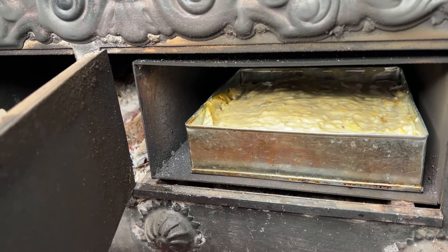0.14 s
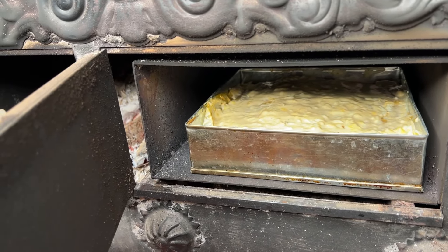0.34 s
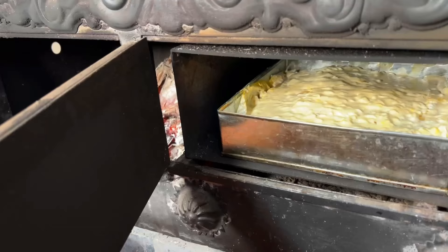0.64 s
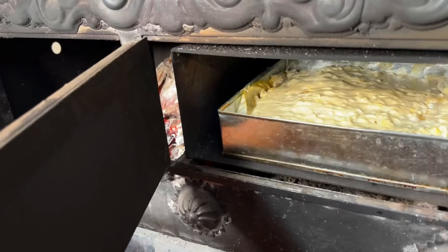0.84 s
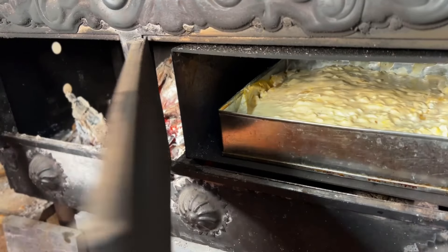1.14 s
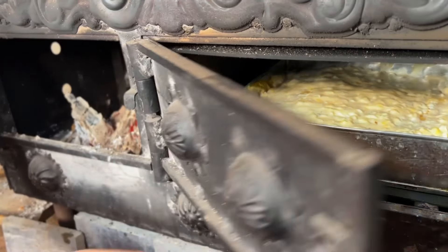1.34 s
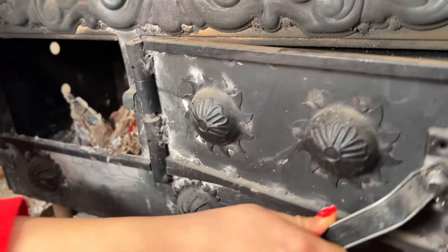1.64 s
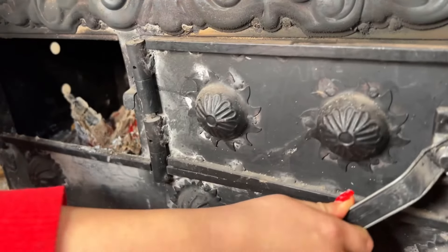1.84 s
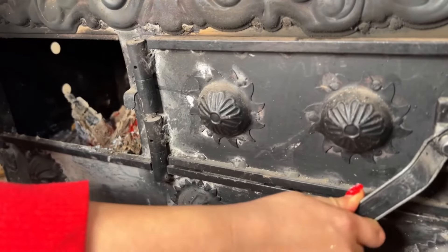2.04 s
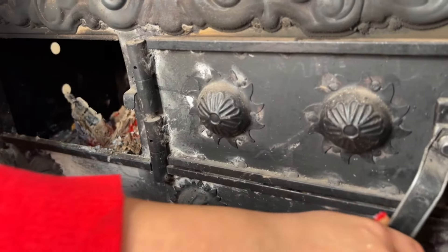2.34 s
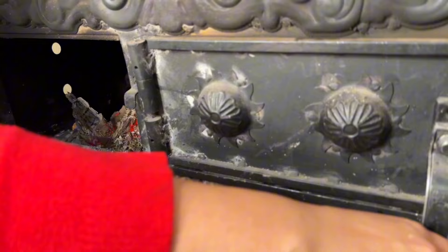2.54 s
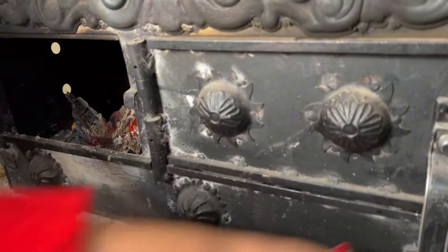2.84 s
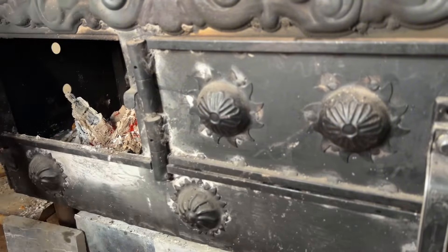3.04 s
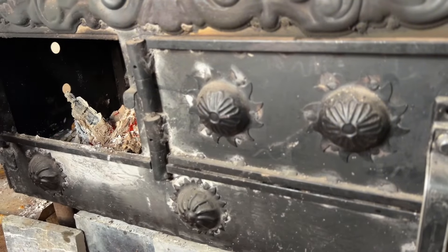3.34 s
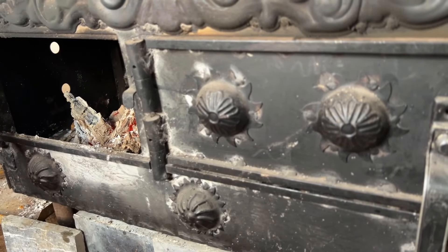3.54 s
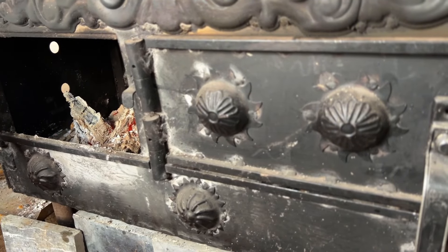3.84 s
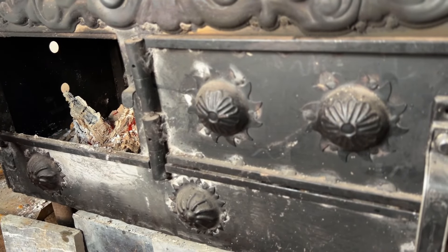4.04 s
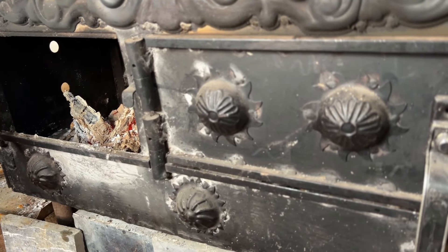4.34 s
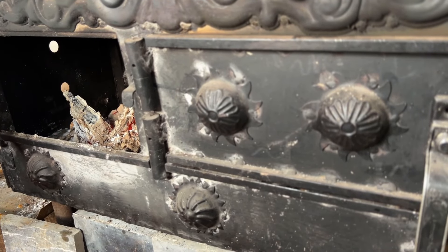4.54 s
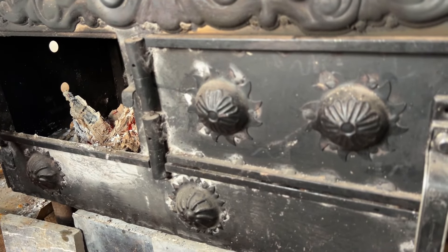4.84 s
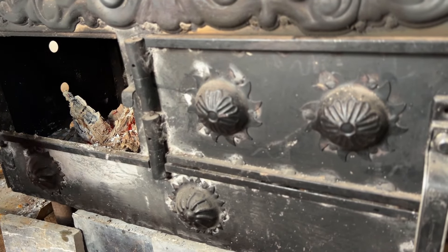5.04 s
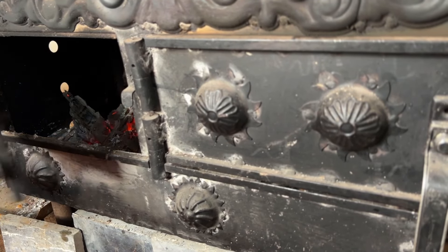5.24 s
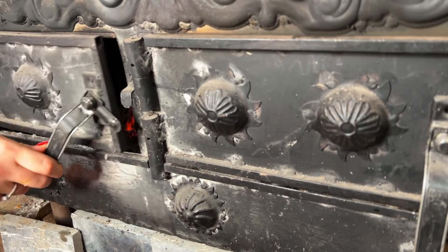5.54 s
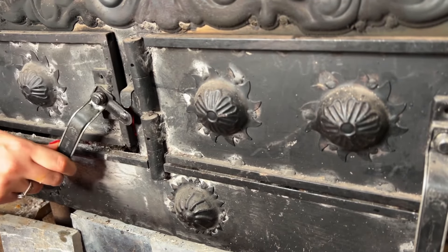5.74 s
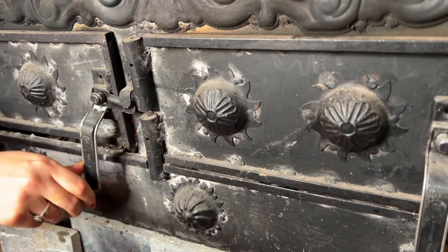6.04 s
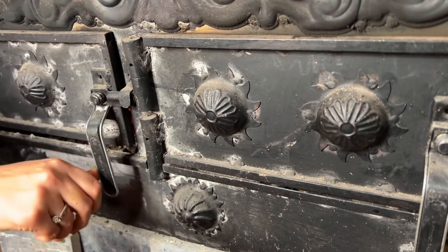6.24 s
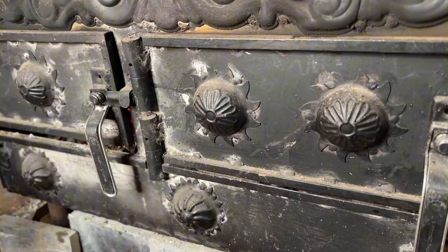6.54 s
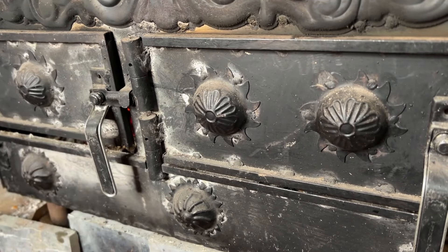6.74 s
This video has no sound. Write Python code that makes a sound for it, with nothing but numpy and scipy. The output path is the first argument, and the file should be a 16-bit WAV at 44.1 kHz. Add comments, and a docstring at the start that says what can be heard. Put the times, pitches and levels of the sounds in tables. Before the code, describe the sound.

Two cast-iron stove doors swing shut close by: a hinge groan and loud knocks, then a piercing squeal, a heavy slam and a latch clank.

```python
"""In a kitchen, heard from close by, two cast-iron stove doors are swung shut and latched.
The dry hinges judder, groan and squeal: wavering tones with multiples, one door mode after another.
The doors knock home, the latch clanks and the stove ticks: clicks ring the iron and start noise bursts.
Below lie the rub of the hinge pins, which keeps the doors singing, and a low rumble of draught
that swells with the thump of the blows, all from noise."""
import sys
import numpy as np
from scipy import signal
from scipy.io import wavfile
from scipy.ndimage import uniform_filter1d

SR = 44100
rng = np.random.default_rng(int(sys.argv[2]) if len(sys.argv) > 2 else 0)


def int16_out(signal):
    """Quantize to a 16-bit WAV file."""
    q = np.round(np.clip(np.atleast_2d(signal).T, -1, 1) * 32767)
    wavfile.write(sys.argv[1], SR, q.astype(np.int16))


N = 303929
TIME = np.arange(N) / SR
CONTACT_S = .002   # how softly a blow lands


def undb(db):
    """Decibels to gain."""
    return 10 ** (np.asarray(db) / 20)


def rms_one(x):
    """Scale to unit rms."""
    return x / np.sqrt(np.mean(x ** 2) + 1e-20)


def at_hz(points, hz):
    """Read a table of (frequency, value) on a log-frequency axis."""
    points = np.array(points)
    return np.interp(np.log(hz), np.log(points[:, 0]), points[:, 1])


def swell(t, peak_s, hold_s, growth, fall):
    """Decibels below the peak: a steady growth, a hold, a steady fall."""
    rising = -abs(growth) * np.maximum(peak_s - t, 0)
    falling = -abs(fall) * np.maximum(t - peak_s - hold_s, 0)
    return rising + falling


def summed(levels_db):
    """Power sum of levels, in dB."""
    return 10 * np.log10(sum(undb(db) ** 2 for db in levels_db) + 1e-30)


def drift(rate_hz, size):
    """Random wander of unit spread, faster at a higher rate, drawn 400 times a second."""
    knots = rng.standard_normal(int(size / SR * 400) + 2)
    r = np.exp(-2 * np.pi * min(rate_hz, 190) / 400)
    wander = rms_one(signal.detrend(signal.lfilter([1], [1, -r], knots)))
    return np.interp(np.arange(size) * 400 / SR, np.arange(len(knots)), wander)


def band_noise(low_hz, high_hz, order, white):
    """White noise kept between two frequencies."""
    return signal.sosfilt(signal.butter(order, [low_hz, high_hz], "band", fs=SR, output="sos"), white)


def add_note(out, note, side, orders, bend, ring_db, ring_fall, faster, linger_s,
             wobble, flutter_db, slide=0, rasp=0):
    """One note of the iron: a wavering tone and any multiples grow, hold and fall, and the tone rings on.

    bend: pitch share per dB below the peak; wobble: random pitch share; slide: Hz/s; rasp: fast roughness.
    ring_db, ring_fall: start [dB] and fall [dB/s] of the ringing on.
    faster, linger_s: each further multiple moves this many dB/s faster; multiples hold this much longer.
    """
    peak_s, hold_s, pitch_hz, level_db, growth, fall = note
    span = slice(int(peak_s * SR) - SR // 6, int(peak_s * SR) + SR // 2)
    t = TIME[span]
    driven = swell(t, peak_s, hold_s, growth, fall)
    hz = pitch_hz * (1 + bend * np.maximum(driven, ring_db) + wobble * drift(82, len(t)))
    slide_lead_s = .025   # the slide starts this long before the peak and stops as long after the hold
    hz += slide * np.clip(t - peak_s, -slide_lead_s, hold_s + slide_lead_s)
    phase = 2 * np.pi * np.cumsum(hz) / SR
    fade = np.clip(np.minimum(t - t[0], t[-1] - t) / .03, 0, 1)
    pan_db, lead, lead_step = side
    for k, order_db in orders:
        if k == 1:
            shape = summed([driven, ring_db + swell(t, peak_s, hold_s, growth, ring_fall)])
        else:
            extra = faster * (k - 1)
            shape = swell(t, peak_s, hold_s + linger_s, growth + extra, fall + extra)
        flutter = flutter_db * np.sqrt(k) * drift(42, len(t))
        level = level_db + order_db + uniform_filter1d(shape, size=120) + flutter
        gain = np.sqrt(2) * fade * undb(level)
        gain *= 1 + rasp * k * drift(190, len(t))
        turn = (lead + lead_step * (k - 1)) / 2
        out[0, span] += gain * undb(pan_db / 2 / k) * np.sin(k * phase + turn)
        out[1, span] += gain * undb(-pan_db / 2 / k) * np.sin(k * phase - turn)


# The squeal steps down from mode to mode: (peak time [s], hold [s], pitch [Hz], level [dB rms],
# level of the octave above [dB], growth [dB/s], fall [dB/s], pitch slide [Hz/s])
SQUEALS = [(5.197, .006, 7440, -6, -17, 1350, 1800, 3000), (5.21, .037, 7440, -8, -17, 2500, 1300, -3000),
           (5.256, .027, 6750, -5.5, -12.5, 5000, 2500, 800), (5.292, .036, 6185, -7, -16, 4000, 350, -500),
           (5.334, .048, 5920, -10.5, -11, 3500, 900, 200), (5.41, .04, 5940, -19.5, -3.5, 1900, 280, 100)]
# Where each squeal radiates from the plate:
# (left over right [dB], left phase lead [rad], further lead per multiple [rad])
SQUEAL_SIDES = [(4, -.3, -1.1), (1, .05, -1.2), (2, -.1, .01), (3.5, -2.3, 3.3), (2, -1.7, 3.1),
                (4, -1.5, 3)]


def squeal():
    """The dry hinge locks onto one high door mode after another, each a tone with its octave."""
    out = np.zeros((2, N))
    for (s, hold_s, hz, db, octave_db, growth, fall, slide), side in zip(SQUEALS, SQUEAL_SIDES):
        add_note(out, (s, hold_s, hz, db, growth, fall), side, [(1, 0), (2, octave_db)],
                 bend=.0006, ring_db=-24, ring_fall=330, faster=220, linger_s=.001,
                 wobble=.003, flutter_db=1, slide=slide, rasp=.08)
    return out


# Groans, each on one door mode: (peak time [s], hold [s], pitch [Hz], level [dB rms],
# shift of the multiples [dB], fall [dB/s], pitch slide [Hz/s])
GROANS = [(1.106, .02, 791, -8.5, 2.5, 600, -120), (1.19, .02, 787, -26, -15, 115, -60),
          (1.17, .035, 717, -23, 3, 130, -300), (1.21, .035, 628, -33, -5, 170, -120),
          (5.44, .1, 548, -31.5, 5, 150, 30), (5.5, .04, 578, -35, 5, 180, -30),
          (5.645, .01, 550, -38, 12, 600, 30)]
# Sound above the note: (multiple of the pitch, level against the note before that shift and the dulling [dB])
GROAN_ORDERS = [(2, -23), (3, -22), (4, -30), (5, -32), (6, -29), (7, -37), (8, -43), (9, -45), (10, -51)]
# How much duller each groan gets: one value a groan [dB per multiple above the second]
GROAN_DULLING = (-.3, -2, -9, -4, -3, -5, -3)
# Where each groan radiates: (left over right [dB], left phase lead [rad], further lead per multiple [rad])
GROAN_SIDES = [(4, -2.4, 2.2), (-4, -.4, .7), (-6, .8, .1), (-10, -.6, .1), (2, 2.4, .1), (-2, 1, .1),
               (.1, -.2, 3)]


def groans():
    """The dry hinge locks onto lower door modes, each a tone with many multiples."""
    out = np.zeros((2, N))
    for groan, side, dull_db in zip(GROANS, GROAN_SIDES, GROAN_DULLING):
        s, hold_s, hz, db, overtones_db, fall, slide = groan
        orders = [(1, 0)]
        orders += [(k, order_db + overtones_db + (k - 2) * dull_db) for k, order_db in GROAN_ORDERS]
        add_note(out, (s, hold_s, hz, db, 620, fall), side, orders,   # grows 620 dB/s
                 bend=-.0003, ring_db=-30, ring_fall=120, faster=100, linger_s=.015,
                 wobble=.004, flutter_db=1.2, slide=slide, rasp=.1)
    return out


# The oven hinge breaks loose:
# (peak time [s], hold [s], pitch [Hz], level [dB rms], growth [dB/s], fall [dB/s])
JUDDER = (.772, .02, 216, -22.5, 1100, 400)
# Make-up of the judder: (multiple of the pitch, level against the judder's [dB])
JUDDER_ORDERS = [(1, 0.5), (2, -8), (3, -16), (4, -11.5), (5, -10.5), (6, -13), (7, -10.5), (8, -14.5),
                 (9, -42), (10, -41), (11, -20)]
# Where it radiates: (left over right [dB], left phase lead [rad], further lead per multiple [rad])
JUDDER_SIDE = (0.13, -.87, .1)


def judder():
    """The oven hinge breaks loose: a short low note rich in multiples."""
    out = np.zeros((2, N))
    add_note(out, JUDDER, JUDDER_SIDE, JUDDER_ORDERS,
             bend=-.0004, ring_db=-18, ring_fall=60, faster=20, linger_s=.01, wobble=.0068, flutter_db=2.0)
    return out


# Faint plain tones: sum tones and sidebands of the squeal, and lower ringing tones:
# (peak time [s], pitch [Hz], level [dB rms], growth [dB/s], fall [dB/s])
PLAIN_TONES = [(5.336, 5636, -22, 2000, 340), (5.44, 6480, -40, 400, 300), (5.46, 5411, -42, 250, 260),
               (5.3, 2216, -32, 300, 230), (5.3, 7425, -36, 300, 500), (5.368, 12127, -28, 300, 900),
               (5.292, 8404, -37, 4000, 380), (5.466, 11365, -46, 370, 650), (.865, 426, -31, 500, 90),
               (.8, 246, -30, 600, 80), (5.292, 8950, -46, 4000, 600), (1.13, 1250, -48, 200, 60)]
# Where each is heard: (left over right [dB], left phase lead [rad], unused lead per multiple [rad])
PLAIN_TONE_SIDES = [(2.1, -1.1, 0), (2.1, -1.1, 0), (2.1, -1.1, 0), (2.1, -0.72, 0), (3, -0.44, 0),
                    (0, 0.066, 0), (0, .5, 0), (0, 0.21, 0), (.5, -0.43, 0), (0.5, -0.71, 0), (0, .5, 0),
                    (0, .5, 0)]


def plain_tones():
    """Faint plain tones without multiples: sum tones and sidebands of the squeal, and lower ringing tones."""
    out = np.zeros((2, N))
    for (s, hz, db, growth, fall), side in zip(PLAIN_TONES, PLAIN_TONE_SIDES):
        add_note(out, (s, 0, hz, db, growth, fall), side, [(1, 0)],
                 bend=.0001, ring_db=-40, ring_fall=300, faster=0, linger_s=0, wobble=.002, flutter_db=2)
    return out


# The pin slips as the squeal changes mode: (time [s], level [dB rms], fall [dB/s])
SLIPS = [(5.198, -42, 900), (5.256, -39, 1200), (5.292, -38, 400), (5.334, -40, 300)]


def slips():
    """Each slip of the pin is a short rasp of noise between 4.3 and 7 kHz."""
    rasp = rms_one(band_noise(4300, 7000, 4, rng.standard_normal(N)))
    return rasp * undb(summed([db + swell(TIME, s, 0, 4000, fall) for s, db, fall in SLIPS]))


# Middles of the four bands in which a blow is described: thud, body, clank, tick [Hz]
BLOW_BANDS_HZ = (150, 650, 3000, 9000)


def strikes(blows, hz):
    """Stereo click train of the blows, with their strength at one frequency."""
    s, clank, thud, body, tick, pan_db = np.transpose(blows)
    levels = np.transpose([thud, body, clank, tick])
    level_db = np.array([at_hz(list(zip(BLOW_BANDS_HZ, row)), hz) for row in levels])
    clicks = np.full((2, N), 1e-18)
    clicks[:, (s * SR).astype(int)] = undb(level_db + np.outer([.5, -.5], pan_db))
    return clicks


def ringing(blows, modes, level_db, shorten, spread_db):
    """Every blow strikes the iron's modes with random strength; each mode has its own lag on the right."""
    out = np.zeros((2, N))
    at = (np.array(blows)[:, 0] * SR).astype(int)
    for hz, mode_db, t60 in modes:
        clicks = strikes(blows, hz) * undb(level_db + .5 * mode_db)
        clicks[:, at] *= undb(rng.normal(0, spread_db, len(at))) * rng.choice([-1, 1], len(at))
        r, w = undb(-60 / (shorten * t60 * SR)), 2 * np.pi * hz / SR
        ring = signal.lfilter([0, np.sin(w)], [1, -2 * r * np.cos(w), r * r], clicks + 1e-18)
        soft = np.exp(-1 / (CONTACT_S * SR))   # the contact lasts a few ms, so the ring swells
        ring = signal.lfilter([1 - soft], [1, -2 * soft * np.cos(w), soft * soft], ring) * 2 * np.sin(w)
        lag = rng.integers(0, 16)
        out[0] += ring[0]
        out[1, lag:] += ring[1, :N - lag]
    return out


# Knocks of the oven door, levels relative: (time [s], clank 1.5-6 kHz [dB], thud 60-300 Hz [dB],
# body 0.3-1.5 kHz [dB], tick 6-15 kHz [dB], left over right [dB])
OVEN_BLOWS = [(1.9976, -62, -19, -18, -89, -2), (2.0264, -40, -20.5, -21.5, -114, 3),
              (2.2096, -88.5, -28.5, -22, -76, 0), (2.2316, -51.5, -31.5, -30, -48, 1.5),
              (2.2524, -60, -34, -25, -56.5, 3.5), (2.3116, -45.5, -28.5, -54, -49.5, 2),
              (2.3347, -49.5, -48.5, -53.5, -36, 1), (2.3856, -30.5, -24, -34, -35.5, 0.5),
              (2.4435, -45, -24, -20, -61, 1), (2.5105, -20.5, -24, -31, -24, 0.5),
              (2.7353, -53, -32, -50, -105, -0.5)]
# Modes of the oven door: (pitch [Hz], relative level, halved in use [dB], 60 dB decay before shortening [s])
OVEN_MODES = [(112.3, -7, 1.0), (286.9, 10, 0.82), (348, 14, 0.65), (387, -5.5, 0.41), (427, 3, 0.16),
              (684.7, -4, .5), (877, 9, 0.29), (943, 5, 0.36), (990, -33, 0.16), (1174, 2.5, 0.19),
              (1243, 15.5, 0.29), (1303, 20, 0.33), (1403, 29.5, 0.088), (1674, 5, 0.18), (2331, 8, 0.11),
              (2680, 14, 0.09), (3370, 0.1, 0.15), (4274, 12, 0.09), (5600, -18, 0.17), (7300, -7.5, 0.14)]


def oven_door():
    """The oven door knocks home and its plate rings."""
    return ringing(OVEN_BLOWS, OVEN_MODES, level_db=-12.0, shorten=0.64, spread_db=2.5)


# Knocks of the firebox door, levels relative: (time [s], clank 1.5-6 kHz [dB], thud 60-300 Hz [dB],
# body 0.3-1.5 kHz [dB], tick 6-15 kHz [dB], left over right [dB])
FIREBOX_BLOWS = [(4.852, -33, -55, -45, -43.5, 5.5), (4.8929, -31, -42.5, -33.5, -35.5, 2),
                 (5.663, -8, -15, -7.5, -20.5, -1), (5.667, -12, -12, -12, -42.5, 1)]
# Modes of the firebox door:
# (pitch [Hz], relative level, halved in use [dB], 60 dB decay before shortening [s])
FIREBOX_MODES = [(89.7, -11, 1.2), (223.8, -4, 0.6), (294, 1.5, 0.98), (395, -20, 1.0), (549, 0, 0.61),
                 (700, 4.5, 0.3), (770, -11.5, 0.46), (882, -2.5, 0.15), (1204, -0.5, 0.3),
                 (1421, -12, 0.2), (1452, -19.5, 0.29), (1663, -32.5, 0.4), (1680, -7.5, 0.28),
                 (1943, -13, 0.19), (2380, -17.5, 0.18), (2482, -21, 0.19), (3020, -5.5, 0.04),
                 (2898, -29, 0.2), (3025, -17.5, 0.19), (3130, -18.5, 0.088)]


def firebox_door():
    """The firebox door knocks home and its plate rings."""
    return ringing(FIREBOX_BLOWS, FIREBOX_MODES, level_db=-7.5, shorten=0.66, spread_db=1.0)


# Clanks of the latch, levels relative: (time [s], clank 1.5-6 kHz [dB], thud 60-300 Hz [dB],
# body 0.3-1.5 kHz [dB], tick 6-15 kHz [dB], left over right [dB])
LATCH_BLOWS = [(5.9593, -57.5, -37.5, -48, -67.5, -1.0), (6.1324, -19, -13, -24.5, -26.5, 0.5),
               (6.2393, -55.5, -32, -49, -53, -1.0)]
# Modes rung by the latch:
# (pitch [Hz], relative level, halved in use [dB], 60 dB decay before shortening [s])
LATCH_MODES = [(91.8, -5, 1.3), (221.3, -13.5, 0.59), (302, 12, 0.6), (425, -8, .8), (527, 7, 0.53),
               (1194, -23, 0.41), (1404, -13, 0.21), (1662, -16, 0.41), (2170, -49, 0.55),
               (3130, 10, 0.089), (3262, -4, 0.08), (3380, 5, 0.17), (3500, 5, 0.15)]


def latch():
    """The latch clanks and sets the iron ringing."""
    return ringing(LATCH_BLOWS, LATCH_MODES, level_db=-6.0, shorten=0.76, spread_db=1.0)


# Small ticks of the stove, levels relative: (time [s], clank 1.5-6 kHz [dB], thud 60-300 Hz [dB],
# body 0.3-1.5 kHz [dB], tick 6-15 kHz [dB], left over right [dB])
TICKS = [(0.2023, -60, -78, -74, -40, 1), (0.4577, -44.5, -109, -51, -45, 4),
         (0.5395, -66, -93, -61, -70, -3), (0.6669, -43.5, -61, -59, -40, 2.5),
         (1.889, -58, -74, -58, -53, 7), (3.0744, -74.5, -78.5, -88.5, -56.5, 4.5),
         (3.5557, -43.5, -54, -45.5, -39.5, 2.5), (3.9735, -62, -74, -63, -56, 4),
         (4.2118, -36, -64, -46, -42, 1.5), (4.2385, -48, -60, -52, -52, 1),
         (4.4745, -44.5, -56, -50, -43, 3)]
# Modes rung by the ticks:
# (pitch [Hz], relative level, halved in use [dB], 60 dB decay before shortening [s])
TICK_MODES = [(700, -10, .15), (1174, -4, .2), (1523, 10, .26), (1846, 4, .3), (2331, -3, .13),
              (2620, 3, .1), (3128, 3, .11), (5771, -20, .08)]


def stove_ticks():
    """Small ticks ring the stove's modes faintly."""
    return ringing(TICKS, TICK_MODES, level_db=-10.0, shorten=0.7, spread_db=4.0)


# Dull pushes on the stove body: (time [s], pitch [Hz], peak level [dB], half length [s])
THUMPS = [(2.403, 110, -15, .007), (4.248, 100, -39, .01), (4.288, 105, -36, .016), (4.995, 95, -31, .01)]


def thumps():
    """Each push is a few swings of a low tone under a bell-shaped envelope."""
    out = np.zeros(N)
    for s, hz, db, half_s in THUMPS:
        bell = np.exp(-((TIME - s) / half_s) ** 2)
        out += undb(db) * bell * np.cos(2 * np.pi * hz * (TIME - s))
    return out


def dying(clicks, t60, rise_s):
    """Envelope that rises briefly after each click and dies away."""
    rise = np.exp(-1 / (rise_s * SR))
    fall = signal.lfilter([1], [1, -undb(-120 / (t60 * SR))], clicks ** 2 + 1e-18)   # on power
    return np.sqrt(signal.lfilter([1 - rise], [1, -rise], fall))


# Edges of the half-octave noise bands [Hz]
BAND_EDGES_HZ = 30 * 2 ** np.arange(0, 9.1, .5)
CENTRES_HZ = np.sqrt(BAND_EDGES_HZ[:-1] * BAND_EDGES_HZ[1:])
# How long the noise of a blow lasts: (frequency [Hz], 60 dB decay, shortened for the ticks [s])
BLOW_DECAY = [(60, 0.66), (160, 0.73), (420, 0.56), (1100, 0.31), (2910, 0.18), (7680, 0.13)]


def blow_noise():
    """Every blow and tick starts a dense crack and a dying tail; yields its gain band by band."""
    blows = OVEN_BLOWS + FIREBOX_BLOWS + LATCH_BLOWS
    for hz, width in zip(CENTRES_HZ, np.diff(BAND_EDGES_HZ)):
        t60, rise_s = at_hz(BLOW_DECAY, hz), 1.3 / hz + .5 * CONTACT_S   # lows start later
        hits, ticks = strikes(blows, hz), strikes(TICKS, hz)
        struck = undb(-7.5) * dying(hits, t60, rise_s)
        struck += undb(-2.5) * dying(hits, .04, rise_s)
        struck += 0.65 * dying(ticks, 0.02, rise_s)
        struck += undb(-8.5) * dying(ticks, .9 * t60, rise_s)
        ends = min(hz / 110, 1) ** 4.5 * min(8000 / hz, 1) ** 0.83   # weaker at both ends
        yield struck * np.sqrt(SR / 2 / width) * undb(-9.0) * ends


# Hiss of the judder, first above and then below 2 kHz:
# (peak time [s], hold [s], relative level [dB], growth [dB/s], fall [dB/s])
JUDDER_HISSES = ((.762, .02, -24, 800, 400), (.764, .042, -30, 750, 250))


def judder_hiss():
    """A burst of hiss comes with the judder; yields its gain band by band."""
    high, low = [undb(db + swell(TIME, s, hold, up, down)) for s, hold, db, up, down in JUDDER_HISSES]
    for hz in CENTRES_HZ:
        treble = 1.7 * high * (hz > 2000) * min(6000 / hz, 1) ** 2.5
        yield treble + 2.04 * low * (400 < hz < 2000)


# Rubbing strokes: oven door swings, its latch is worked, a rustle, firebox door swings, catches,
# its latch slides, a last rustle: (peak time [s], hold [s], relative level 0.4-2 kHz [dB],
# relative level 2.5-9 kHz [dB], growth [dB/s], fall [dB/s]); the treble grows and falls less
RUB = [(.79, .01, -38, -65, 230, 70), (1.2, .1, -41, -57.5, 30, 30), (2.44, .04, -39, -63.5, 90, 180),
       (3.28, .04, -63, -63, 150, 100), (4.9, .2, -48.5, -57.5, 400, 50), (5.29, .06, -48, -62, 200, 60),
       (5.9, .2, -56, -64, 30, 100), (6.8, .1, -61, -71, 60, 40)]
# Colour of the rubbing: (frequency [Hz], relative level [dB per Hz])
RUB_COLOUR = [(120, -29), (200, -9), (385, -9), (640, -14), (701, -22), (1070, -13.5), (1260, -11.5),
              (1510, -15), (1650, -13), (8170, -17), (10200, -30.5), (12200, -17.5), (15400, -30.5)]


def rubbing():
    """The hinge pins rub: uneven noise that swells with each stroke; yields its gain band by band."""
    low_db, high_db = [-68], [-77.5]   # steady floor under the strokes
    for s, hold, low, high, up, down in RUB:
        stroke = swell(TIME, s, hold, up, down)
        low_db.append(low + stroke)
        high_db.append(high + .6 * stroke)
    low_db, high_db = summed(low_db), summed(high_db)
    grain_db = 2.5 * drift(30, N)   # the rubbing catches unevenly, in all bands at once
    for hz in CENTRES_HZ:
        bright = np.clip(np.log(hz / 900) / np.log(4500 / 900), 0, 1)
        level_db = low_db + bright * (high_db - low_db) + at_hz(RUB_COLOUR, hz) + 25
        yield undb(level_db + 1.2 * drift(6.2, N) + grain_db)


def rub_tones(peaks, strokes, end_s):
    """Grainy noise through narrow resonances, each applied twice, in the 1.5 s before the door stops."""
    span = slice(int(end_s * SR) - 3 * SR // 2, int(end_s * SR))
    t, out, modes = TIME[span], np.zeros((2, N)), 0
    white = rng.standard_normal((2, len(t))) * undb(4.0 * drift(60, len(t)))
    for hz, width, peak_db, best_s, fading in peaks:
        r = np.exp(-np.pi * width / SR)
        mode = [1 - r, 0, r - 1, 1, -2 * r * np.cos(2 * np.pi * hz / SR), r * r]
        level_db = peak_db + swell(t, best_s, 0, fading, fading) + 3.0 * drift(6, len(t))
        modes = modes + undb(level_db) * signal.sosfilt([mode, mode], white)
    level_db = summed([db + swell(t, s, hold, up, down) for s, hold, db, up, down in strokes])
    out[:, span] = rms_one(modes) * undb(level_db)
    return out


# Oven door modes kept singing by the rubbing: (pitch [Hz], width of one pass [Hz], relative level [dB],
# time when strongest [s], fading before and after [dB/s])
OVEN_SING = [(1230, 110, -4.5, 1.3, 5), (1720, 42, -2, 1.45, 15), (2290, 85, -3, 1.5, 25),
             (3060, 60, -6, 1.5, 15), (3620, 90, -5, 1.4, 10), (4000, 200, -9, 1.35, 20),
             (6980, 170, -8, 1.42, 70), (7550, 250, -14, 1.6, 50), (8300, 350, -15, 1.58, 60)]
# Loudness of the singing: (peak time [s], hold [s], level [dB], growth [dB/s], fall [dB/s])
OVEN_SING_DB = [(1.05, .02, -48.5, 150, 16)]


def oven_singing():
    """The rubbing keeps the oven door singing until it stops."""
    return rub_tones(OVEN_SING, OVEN_SING_DB, end_s=1.995)


# Firebox door modes kept singing by the rubbing: (pitch [Hz], width of one pass [Hz],
# relative level [dB], time when strongest [s], fading before and after [dB/s])
FIREBOX_SING = [(900, 24, -1, 5.4, 3), (1310, 160, 3, 5.0, 6), (2560, 39, -16.5, 5.5, 3),
                (3760, 97, -17.5, 5.5, 3), (5190, 47, -12, 5.93, 10), (6260, 94, -21.5, 5.5, 3),
                (7400, 60, -12, 5.85, 60), (8210, 61, -12, 5.1, 30), (8740, 120, -22, 5.1, 30)]
# Loudness of the singing: (peak time [s], hold [s], level [dB], growth [dB/s], fall [dB/s])
FIREBOX_SING_DB = [(4.86, .01, -44, 1400, 24), (5.95, .15, -52, 25, 600)]


def firebox_singing():
    """The rubbing keeps the firebox door singing until it stops."""
    return rub_tones(FIREBOX_SING, FIREBOX_SING_DB, end_s=6.14)


# Swells of the low rumble, some of them the thump of the blows:
# (peak time [s], relative level [dB], fall [dB/s])
RUMBLE = [(.07, -44, 30), (.46, -38, 110), (1.33, -47, 2.5), (2.01, -41, 30), (2.4, -33, 30),
          (3.45, -48, 3), (4.28, -39, 25), (4.65, -45, 4), (5.7, -32, 120), (6.16, -34, 22),
          (6.6, -45, 1.5)]
# Colour of the rumble: (frequency [Hz], relative level [dB per Hz])
RUMBLE_COLOUR = [(15, -42), (25, -24), (81, 8), (123, -10), (190, -41.5), (292, -33.5), (370, -35.5),
                 (420, -50.5), (500, -34), (650, -64), (1100, -120)]


def low_rumble():
    """Low rumble below 500 Hz: draught that wanders, and swells with the thump of the blows; gain by band."""
    levels = [-52 + 1.5 * drift(2.5, N)]
    levels += [db + swell(TIME, s, 0, 200, down) for s, db, down in RUMBLE]
    level_db = summed(levels)
    for hz in CENTRES_HZ:
        yield undb(level_db + at_hz(RUMBLE_COLOUR, min(hz, 500)) + 22) * (hz < 500)


# How alike left and right are: (frequency [Hz], likeness [0-1])
LIKENESS = [(60, .7), (200, 1), (500, 0.29), (1200, 0.067), (5000, .15), (12000, .6)]


def noise_bands():
    """Half-octave bands of stereo noise, unit density, mixed from a shared and an opposed part."""
    white = rng.standard_normal((2, 2, N))
    for k, (low, high) in enumerate(zip(BAND_EDGES_HZ, BAND_EDGES_HZ[1:])):
        mid, side = band_noise(low, high, 2, white[k % 2])
        alike = np.clip(at_hz(LIKENESS, CENTRES_HZ[k]), 0, 1)
        yield np.sqrt((1 + alike) / 2) * mid + np.sqrt((1 - alike) / 2) * side * [[1], [-1]]


def noises():
    """Rubbing, rumble, hiss and blow noise shape the same noise, band by band."""
    out = np.zeros((2, N))
    sources = zip(noise_bands(), rubbing(), low_rumble(), judder_hiss(), blow_noise())
    for band, rub, rumble, hiss, struck in sources:
        out += band * (rub + rumble + hiss + struck)
    return out


def kitchen(x):
    """Diffuse echo: noise dying away, treble first, different on each side."""
    low_t60_s, treble_t60_s = 1, 0.097
    t = np.arange(SR) / SR
    low, high = rng.standard_normal((2, 2, SR)) * (t > .006)
    low = signal.sosfilt(signal.butter(8, 2000, "low", fs=SR, output="sos"), low)
    high = signal.sosfilt(signal.butter(2, 2000, "high", fs=SR, output="sos"), high)
    echo = low * undb(-60 * t / low_t60_s) / np.sqrt(low_t60_s)
    echo += high * undb(-60 * t / treble_t60_s + 8.0) / np.sqrt(treble_t60_s)
    return undb(-17.5) * np.sqrt(6 * np.log(10) / SR) * signal.fftconvolve(x, echo, axes=1)[:, :N]


def scene():
    """All sources; hinge notes, plain tones, slips, rings and thumps also fill the kitchen."""
    hinges = judder() + groans() + squeal() + plain_tones() + slips()
    iron = hinges + oven_door() + firebox_door() + latch() + stove_ticks() + thumps()
    return iron + kitchen(iron) + noises() + oven_singing() + firebox_singing()


def band_limit(x):
    """A steep low-pass at the top of the band."""
    return signal.sosfilt(signal.butter(12, 15590, fs=SR, output="sos"), x)


def record(dry):
    """Clipped peaks, a dip near 10 kHz, little above 16 kHz, and a brief dip in level at 0.66 s."""
    x = np.clip(dry, -1.05, 1.05)
    x = signal.sosfilt(signal.butter(4, [9200, 11100], "bandstop", fs=SR, output="sos"), x)
    x = signal.sosfilt(signal.cheby2(10, 50, 16000, fs=SR, output="sos"), x)
    x = x * np.interp(TIME, [.658, .660, .666, .667], [1, .05, .05, 1])
    return band_limit(np.clip(x, -1, 1))


dry = scene()
out = record(dry)
int16_out(out)
```